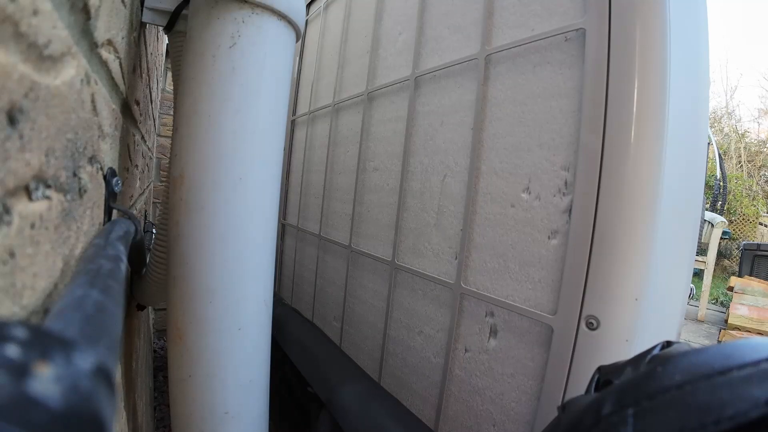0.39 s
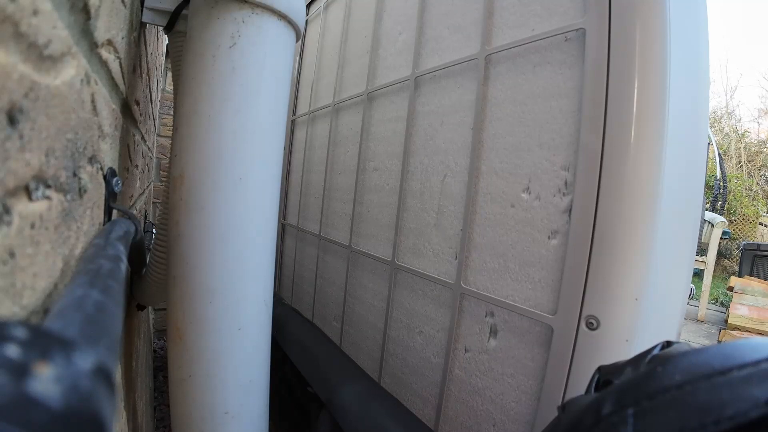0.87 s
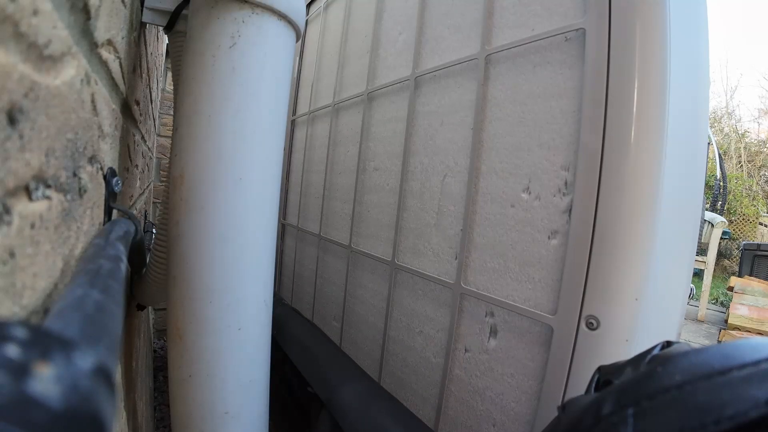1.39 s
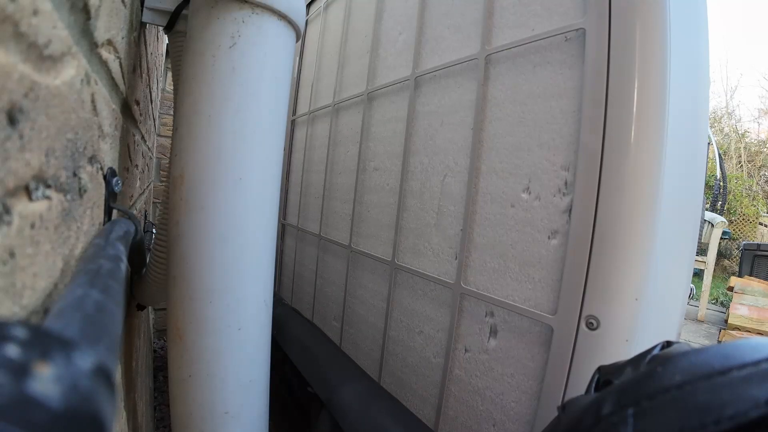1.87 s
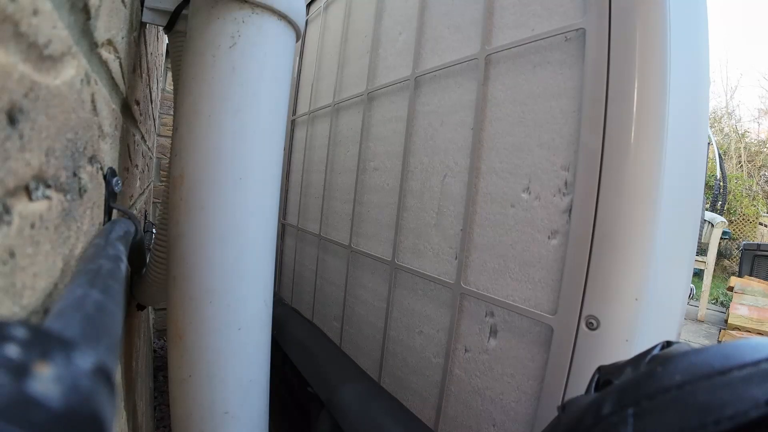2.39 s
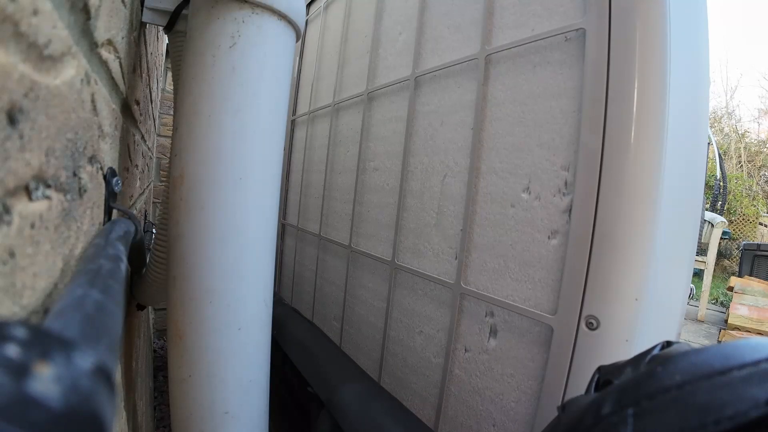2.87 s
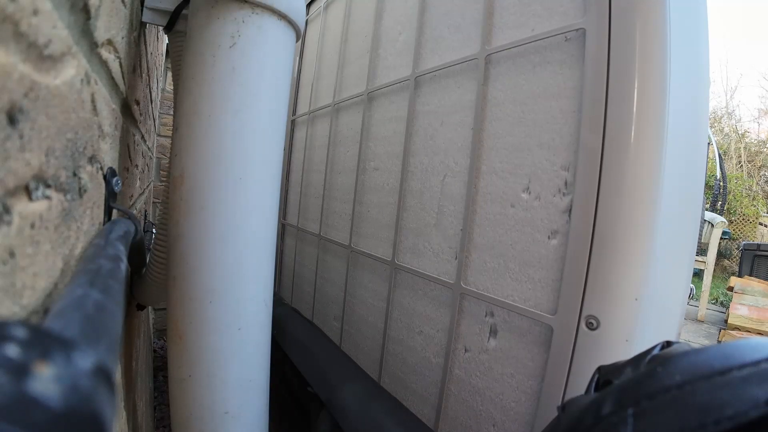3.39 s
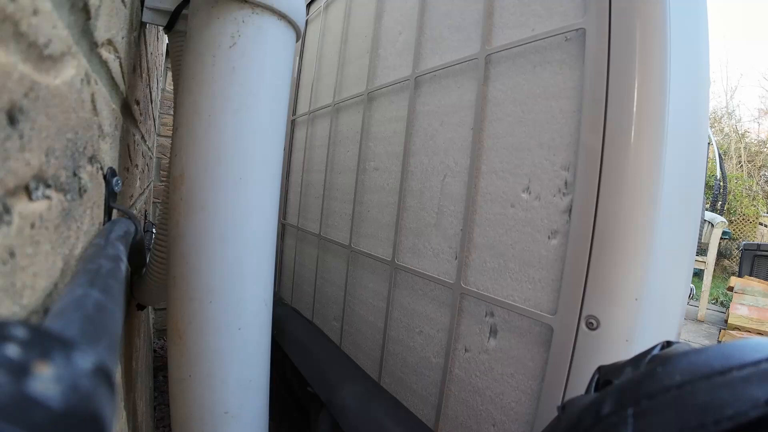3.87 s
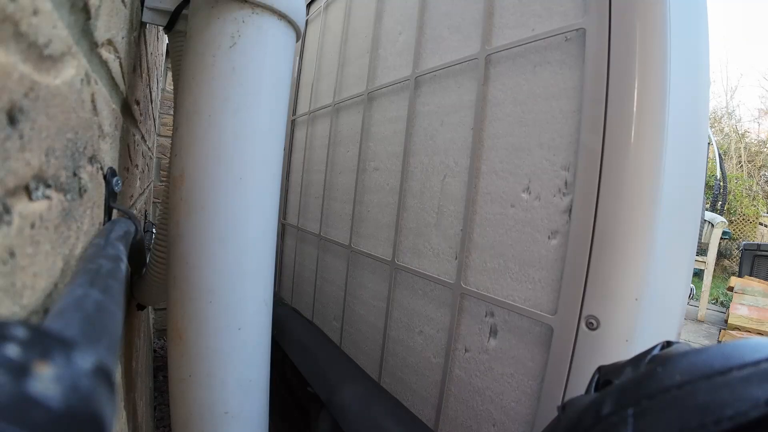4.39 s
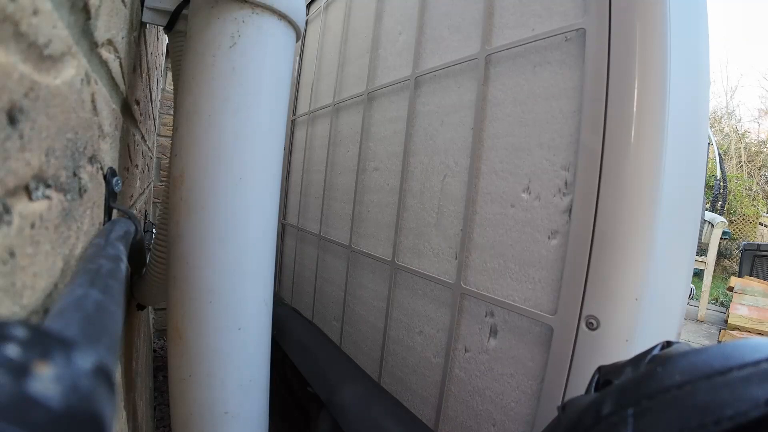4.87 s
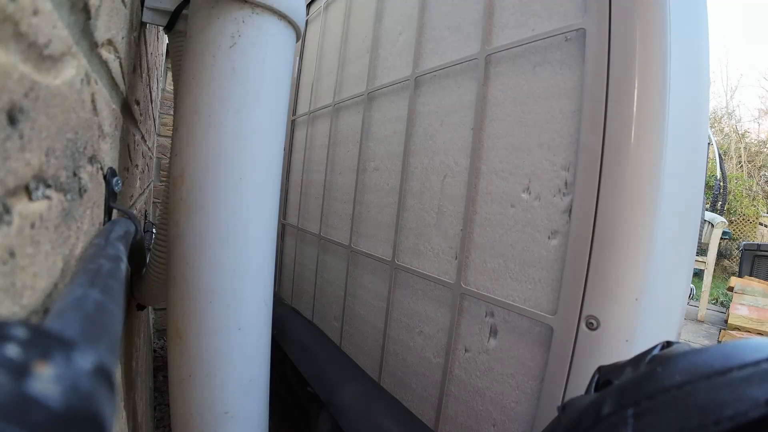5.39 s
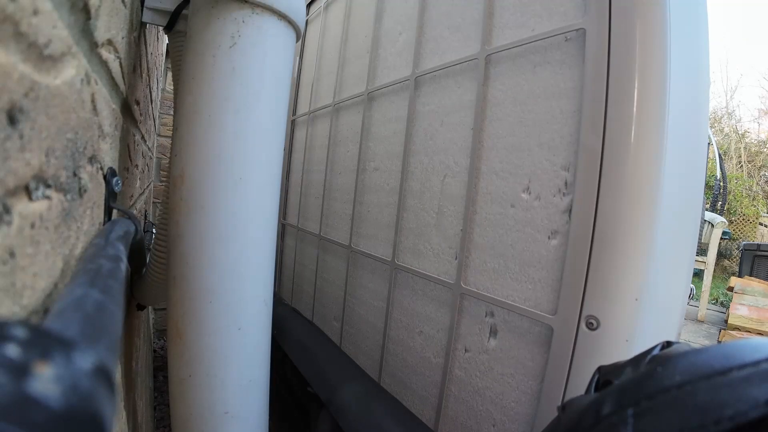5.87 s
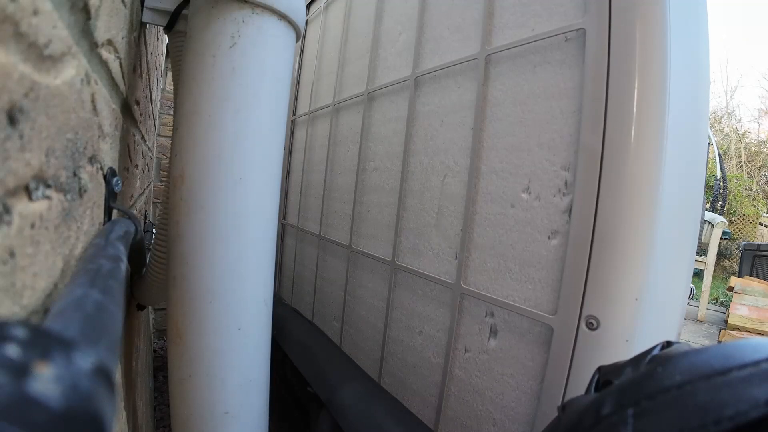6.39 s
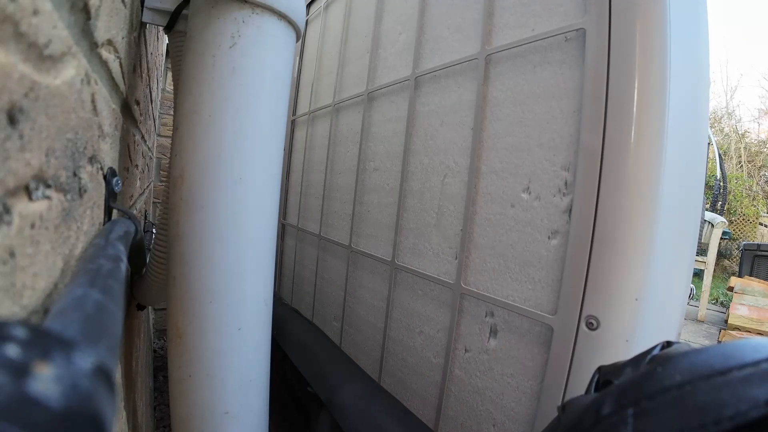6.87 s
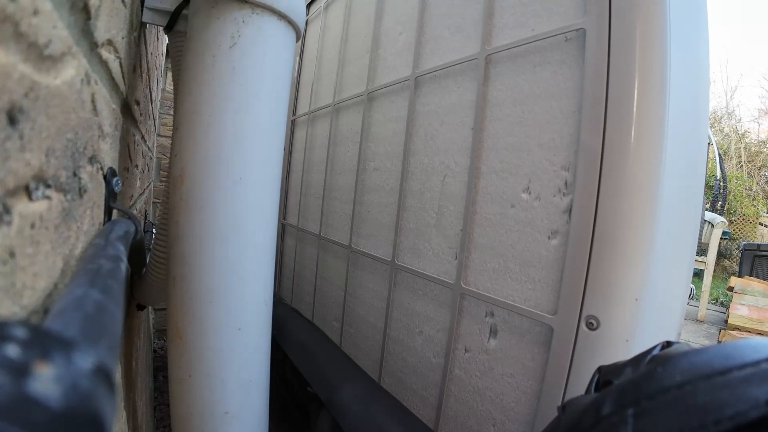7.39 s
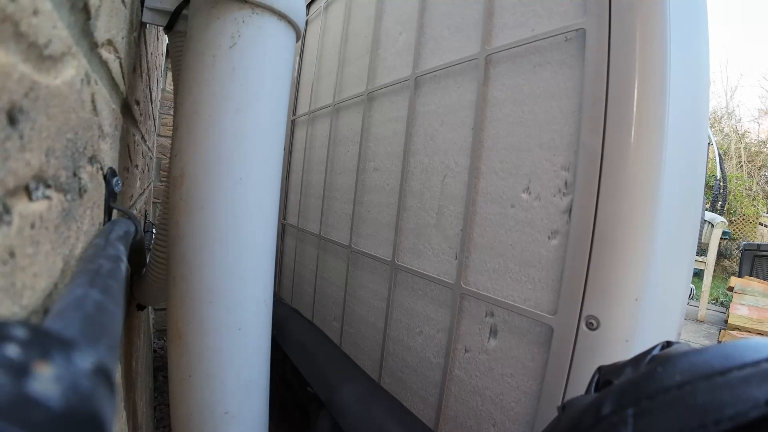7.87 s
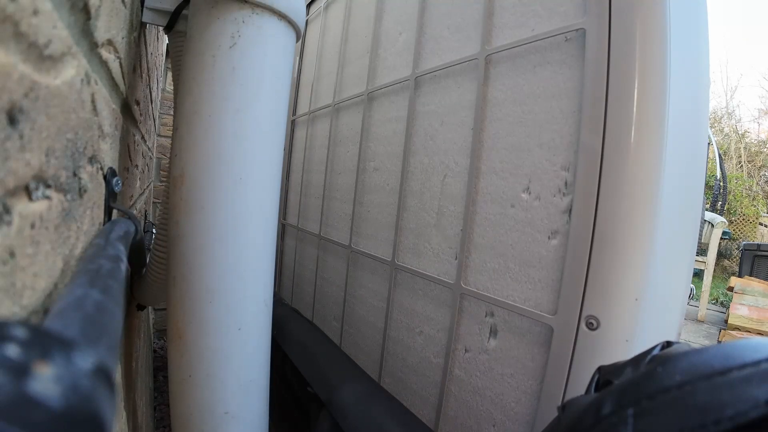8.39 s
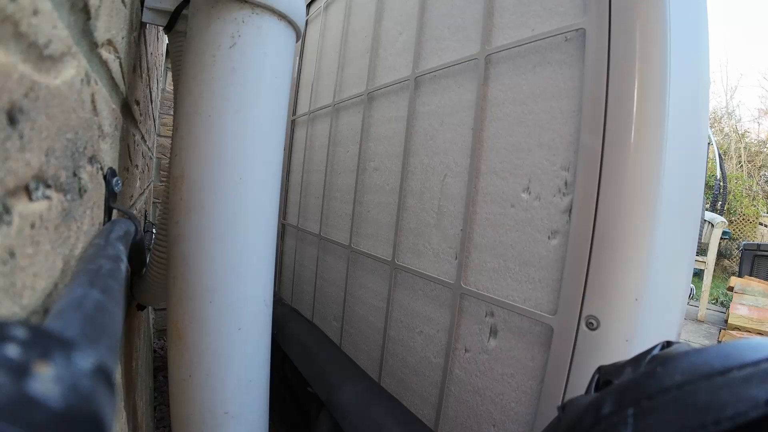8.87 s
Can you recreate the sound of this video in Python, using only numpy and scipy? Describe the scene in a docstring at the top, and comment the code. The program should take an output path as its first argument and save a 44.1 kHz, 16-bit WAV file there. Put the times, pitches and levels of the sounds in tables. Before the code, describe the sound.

A heat pump hums steadily up close, its compressor buzzing low under rushing fan air and faint high whine, while a small bird briefly whistles.

```python
"""An outdoor heat pump heard by two microphones wedged between its coil and a house wall.
Throughout, the compressor hums on multiples of its shaft speed and hisses with each turn, the fan draws
gusty air through the coil and its motor drive whines. From 0.1 s far engine notes glide in the bass;
near 3.75 s the sixth hum multiple swells; from 4.5 to 5.4 s a small bird whistles three long and three
short notes; near 9 s the air rumble lulls."""
import sys
import numpy as np
from scipy import signal
from scipy.fft import rfft, irfft, next_fast_len
from scipy.io import wavfile
from scipy.ndimage import uniform_filter1d

SR = 44100
rng = np.random.default_rng(int(sys.argv[2]) if len(sys.argv) > 2 else 0)


def ratio_of_db(decibels):
    """Turn decibels (scalar or array-like) into linear amplitude factors; 0 dB maps to 1."""
    return 10 ** (np.asarray(decibels, float) / 20)


def wav_record(signal):
    """Record a signal, one row per channel, as 16-bit PCM in the file named by sys.argv[1]."""
    frames = np.transpose(np.atleast_2d(signal))
    bounded = np.clip(frames, -1, 1)
    # unit amplitude maps onto the largest positive 16-bit level
    quanta = np.round(bounded * 32767).astype(np.int16)
    wavfile.write(sys.argv[1], SR, quanta)


N = 397341
T = np.arange(N) / SR
SIZE = next_fast_len(N)
HZ = np.arange(SIZE // 2 + 1) * SR / SIZE
SHAFT_HZ = 119.69


def walk(rate_hz):
    """Smooth random wander, about rate_hz changes a second, spread 1."""
    k = int(SR / rate_hz)
    steps = np.repeat(rng.standard_normal(N // k + 1), k)
    wander = uniform_filter1d(uniform_filter1d(steps, k), k)[:N]
    return wander / wander.std()


def noise(density, white=None):
    """Noise whose power per Hz is density(HZ); white is the spectrum of the raw noise, if shared."""
    if white is None:
        white = rfft(rng.standard_normal(SIZE))
    return irfft(white * np.sqrt(density(HZ) * SR / 2), SIZE)[:N]


def points(table):
    """Power against frequency from (f/Hz, level/dB) points, straight in dB over log frequency."""
    hz, db = np.transpose(table)
    return lambda f: ratio_of_db(2 * np.interp(np.log(f + 1), np.log(hz), db))


def pan(db):
    """Left and right gains for a left minus right level in dB."""
    return ratio_of_db(np.array([[db / 2], [-db / 2]]))


def tone(hz, db):
    """A sine of given rms level; pitch and level may move."""
    cycles = np.cumsum(hz + 0 * T) / SR + rng.random()
    return np.sqrt(2) * ratio_of_db(db) * np.sin(2 * np.pi * cycles)


def bump(peak_s, length_s):
    """A smooth rise and fall to 1 and back; length_s is its width at half height."""
    return 2 ** -(2 * (T - peak_s) / length_s) ** 2


def compressor():
    """One shaft drives both: a hum repeating each turn and gas hiss in bursts with the turn."""
    turn = (np.cumsum(SHAFT_HZ + .025 * walk(3)) / SR) % 1
    return shell_hiss(turn) + hum(turn)


# clearest hum multiples of the shaft speed: multiple, level/dB, left minus right/dB
HUM_PARTIALS = [(1, -35.0, -0.1), (2, -32.8, 0.4), (3, -37.2, 0.0), (4, -48.4, 0.7), (5, -53.8, 0.4),
                (6, -50.6, -0.4), (8, -57, 0), (9, -58, 0), (10, -57, 0), (12, -58.3, 1.0),
                (14, -57.8, 1.4), (16, -56.8, 3.4), (28, -66.0, -0.5), (31, -60.8, 2.8), (32, -67.5, -6.1),
                (35, -62.3, 2.6), (36, -64.3, 6.0), (37, -62.8, -1.4), (39, -70.5, 5.7), (41, -61.7, 0.3),
                (42, -66.8, -6.4), (44, -70.4, 6.4), (45, -69.3, 4.0), (46, -73, 0), (48, -69.8, 0.9),
                (49, -73, 2.2), (54, -73.6, -0.6), (57, -73.3, 1.6), (67, -68.5, 3.4), (71, -72.8, -0.5),
                (72, -70, -0.1), (75, -74, -15.0)]
# other multiples, power over that of 1 Hz of the noise around them: f/Hz, level/dB
FAINT_OVER_NOISE = [(800, 6), (2500, 7), (5000, 10.5), (16000, 11)]


def hum_gains(hz):
    """Partial levels at both microphones; faint multiples scatter a little above the noise."""
    shared_scatter_db, own_scatter_db = 3., 2.5
    over_noise = points(FAINT_OVER_NOISE)(hz)
    air = points(AIR)(hz)
    faint = np.array([np.sqrt((shell_density(hz, side) + air) * over_noise) for side in (1, -1)])
    faint *= hz > 0
    scatter_db = shared_scatter_db * rng.standard_normal(len(hz))
    scatter_db = scatter_db + own_scatter_db * rng.standard_normal((2, len(hz)))
    gains = faint * ratio_of_db(scatter_db)
    for multiple, db, lr_db in HUM_PARTIALS:
        gains[:, int(multiple)] = ratio_of_db(db) * pan(lr_db)[:, 0]
    return gains


def hum(turn):
    """One turn's waveform repeats; unsteady copies make the partials waver; the sixth swells once."""
    size = 8192  # samples in the stored turn
    hz = np.arange(135) * SHAFT_HZ
    gains = hum_gains(hz)
    apart_rad = np.clip(hz / 13000.0, 0, 1.5)  # short waves reach the two microphones out of step
    out = np.zeros((2, N))
    copies = [(1, 0), (.15 * walk(6), 300.), (.15 * walk(25), 1500.)]  # share, lowest Hz
    for share, above_hz in copies:
        phase = 2 * np.pi * rng.random(len(hz)) + apart_rad * rng.standard_normal((2, len(hz)))
        spectrum = gains * (hz > above_hz) * np.exp(1j * phase)
        cycle = irfft(spectrum, size) * size / np.sqrt(2)
        out += share * cycle[:, (turn * size).astype(int) % size]
    # swell: power on top of the steady level
    swell_peak_s, swell_length_s, swell_db = 3.75, 1.7, 9
    extra = np.sqrt(ratio_of_db(2 * swell_db * bump(swell_peak_s, swell_length_s)) - 1)
    sixth = np.sqrt(2) * np.sin(2 * np.pi * (6 * turn + rng.random()))
    return out + extra * gains[:, 6:7] * sixth


# shell and pipe resonances: f/Hz, width at -6 dB/Hz, level per Hz before bursts/dB, left minus right/dB
SHELL = [(732, 88, -71.5, -2), (1100, 99, -69.5, -0.5), (1850, 520, -79, 3), (2720, 88, -76.5, 4),
         (2825, 46, -76, 1), (3014, 62, -81, 0), (3150, 75, -84.5, 4), (3330, 50, -86.5, -17),
         (3520, 180, -84, -2), (4320, 520, -85.5, -1), (4590, 120, -86.5, 5), (5400, 120, -92, 0),
         (6650, 300, -93.5, -2), (7820, 570, -92, 3), (8200, 250, -92, 0), (8500, 430, -91, 3),
         (8750, 250, -90.5, -4), (9380, 600, -98, -5), (10300, 1040, -94.5, -3), (11090, 390, -90.5, -2),
         (11800, 480, -94.5, -10), (12300, 400, -101, -4), (12800, 600, -95, 3), (13400, 900, -91, -5),
         (14700, 600, -101, -4), (15400, 600, -105, 1)]


def shell_density(f, side):
    """Power per Hz of gas hiss ringing in shell and pipes; side is 1 at left, -1 at right."""
    return sum(ratio_of_db(2 * db + side * lr_db) / (1 + (2 * (f - hz) / width_hz) ** 2) ** 2
               for hz, width_hz, db, lr_db in SHELL)


# hiss bursts with the turn: band start f/Hz, depth/dB at one, two and three bursts a turn
BURSTS = [(0, 1.9, 0.82, 0.26), (7200, 1., .5, .5), (9400, .8, 1., 1.8), (12000, 4., 1.5, .5)]


def shell_hiss(turn):
    """Gas hiss in bursts as the valves work; both microphones hear it, by different paths."""
    shared = rfft(rng.standard_normal(SIZE))
    # reflections off the wall shift the treble between the microphones
    knots_hz = np.arange(0, SR / 2 + 300, 300)
    twist_rad = np.interp(HZ, knots_hz, rng.standard_normal(75))
    twist_rad *= np.clip((HZ - 5000.) / 1150.0, 0, 3.5)
    alike = np.sqrt(np.clip(1 - HZ / 24000.0, .7, 1))  # long waves are the same at both
    # each turn partly repeats the one before: treble hiss gathers around the multiples
    repeat = np.clip(0.43 * (HZ - 5000.) / 2400.0, 0, .35)
    comb = (1 - repeat ** 2) / np.abs(1 - repeat * np.exp(2j * np.pi * HZ / SHAFT_HZ)) ** 2
    band_of = np.searchsorted([row[0] for row in BURSTS], HZ, side="right") - 1
    out = np.zeros((2, N))
    for channel, side in enumerate((1, -1)):
        own = rfft(rng.standard_normal(SIZE))
        white = alike * shared * np.exp(.5j * side * twist_rad) + np.sqrt(1 - alike ** 2) * own
        density = comb * shell_density(HZ, side)
        for band, (_, *depths_db) in enumerate(BURSTS):
            gate_db = sum(depth_db * np.cos(2 * np.pi * (k + 1) * turn + band * (k + 2))
                          for k, depth_db in enumerate(depths_db))
            out[channel] += ratio_of_db(gate_db) * noise(lambda f: density * (band_of == band), white)
    return out


BLADE_HZ, BLADES = 30.68, 4


def fan():
    """Air noise, blade tones and drive whine of one fan."""
    return air_noise() + pan(0.58) * blade_tones() + drive_whine()


# air through fan and coil: f/Hz, level per Hz/dB
AIR = [(10, -62), (28, -46), (40, -42), (60, -41), (75, -47.5), (100, -53), (135, -61), (190, -58),
       (260, -61.5), (450, -64.5), (750, -63.5), (1100, -67.5), (2000, -76), (3250, -84.5), (4000, -87.5),
       (6200, -93), (7100, -108), (16000, -125)]
# air noise of opposite sign at the two microphones: f/Hz, level per Hz/dB
AIR_SIDE = [(10, -76), (30, -68), (60, -70), (110, -68), (240, -86), (350, -119), (500, -93), (1500, -90.5),
            (3000, -92.5), (5000, -99), (7000, -107), (16000, -120)]


def air_noise():
    """Turbulence as shaped noise: gusty bass, a slightly wandering top, a part that differs by side."""
    air = points(AIR)
    low = noise(lambda f: air(f) / (1 + (f / 97.0) ** 4)) * ratio_of_db(gusts_db())
    high = noise(lambda f: air(f) / (1 + (118.0 / (f + 1)) ** 4)) * ratio_of_db(0.35 * walk(5))
    side = noise(points(AIR_SIDE)) * np.array([[1], [-1]])
    return pan(0.58) * low + pan(0.42) * high + side


# gusts and lulls in the rumble: peak t/s, length/s, level/dB
GUSTS = [(2.3, 0.42, 2.5), (2.85, 0.32, -5.5), (4.5, 0.45, 1), (5.55, 0.91, 2.5), (7.9, 0.62, 0),
         (8.35, 0.33, 3), (9., .5, -8.5)]


def gusts_db():
    """Level of the air rumble over time, a sum of smooth bumps in dB."""
    return sum(db * bump(peak_s, length_s) for peak_s, length_s, db in GUSTS)


# blade tones: multiple of the blade rate, level/dB
BLADE_TONES = [(1, -36), (2, -36), (10, -47.5)]


def blade_tones():
    """Sines on multiples of the blade passing rate, wandering in pitch and level."""
    return sum(tone(BLADE_HZ * k * (1 + 0.00222 * walk(2)), db + 1.2 * walk(1.97))
               for k, db in BLADE_TONES)


# drive whine: fan turns off switching tone, motor cycles off it, level/dB, left minus right/dB
WHINE = [(0, 0, -60, -7), (1, 0, -75, 2), (-3, 0, -79, 6), (-4, 0, -78, 3), (4, 0, -79, 5),
         (-7, 0, -79, -1), (0, -1, -76, -3), (1, -1, -81, 2), (0, 1, -71, -10), (0, 2, -78, -3)]


def drive_whine():
    """The drive's switching tone with sidebands spaced by fan turns and motor cycles."""
    switch_hz, motor_hz = 7929.5, 99.7
    out = np.zeros((2, N))
    for turns, cycles, db, lr_db in WHINE:
        hz = switch_hz + turns * BLADE_HZ / BLADES + cycles * motor_hz
        out += pan(lr_db) * tone(hz, db + 0.5 * walk(20))
    return out


# bird notes: t/s, length/s, top f/Hz, level/dB
BIRD = [(4.495, .104, 8400, -56), (4.69, .107, 8250, -52.5), (4.885, .115, 8380, -52.5),
        (5.082, .048, 6750, -51), (5.216, .048, 6700, -51), (5.344, .056, 6700, -51.5)]


def bird():
    """Thin whistles hold, then fall ever faster, long ones holding longer; walls and fences smear them."""
    fall_to_share, bend_per_s = .82, 30
    attack_share, release_s = .45, .011  # attack as a share of note length
    notes = [(t_s, length_s, hz, fall_to_share * hz, db) for t_s, length_s, hz, db in BIRD]
    # tiny steady chips just before two short notes
    notes += [(t_s, .016, 7200, 7200, -63) for t_s in (5.068, 5.203)]
    out = np.zeros(N)
    for t_s, length_s, top_hz, end_hz, db in notes:
        u = np.arange(int(length_s * SR)) / (length_s * SR)
        hz = top_hz + (end_hz - top_hz) * u ** (bend_per_s * length_s)
        attack = np.minimum(u / attack_share, 1)
        release = np.minimum((1 - u) * length_s / release_s, 1)
        whistle = np.sqrt(2) * ratio_of_db(db) * np.sin(2 * np.pi * np.cumsum(hz) / SR)
        out[int(t_s * SR):][:len(u)] += attack * release * whistle
    out *= ratio_of_db(1.5 * walk(90))  # the voice and the air flutter
    echoes = ratio_of_db(-29) * rng.standard_normal((2, 4000)) * ratio_of_db(-60 * T[:4000] / .09)  # 60 dB in 0.09 s
    echoes[[0, 1], [2, 0]] = 1  # direct sound reaches the right side first
    return pan(-6.0) * signal.fftconvolve(out[None], echoes, axes=1)[:, :N]


# far engine notes: start t/s, end t/s, start f/Hz, end f/Hz, level/dB
ENGINES = [(0.102, 2.4, 60.6, 59.4, -27), (2.3, 5.3, 89.1, 110.8, -38.5), (4.5, 6.1, 63.5, 64.45, -33),
           (5.501, 6.7, 39.46, 44.5, -30), (6.2, 7.6, 70.1, 78.3, -35), (6.701, 9.3, 58, 57.05, -30)]


def traffic():
    """Low engine notes from far off fade in, glide, waver in level and fade out."""
    out = np.zeros(N)
    for start_s, end_s, start_hz, end_hz, db in ENGINES:
        fade = np.clip(np.minimum(T - start_s, end_s - T) / 0.52, 0, 1)
        hz = np.interp(T, [start_s, end_s], [start_hz, end_hz])
        out += fade * tone(hz, db + 1.4 * walk(2.89))
    return pan(.8) * out


def scene():
    """Heat pump, bird and distant traffic together."""
    return compressor() + fan() + bird() + traffic()


def top_cut(x):
    """Nothing passes above the cut-off."""
    return signal.sosfilt(signal.butter(12, 15600, fs=SR, output="sos"), x)


def record(dry):
    """Stores the finished mix."""
    return top_cut(dry)


dry = scene()
out = record(dry)
wav_record(out)
```